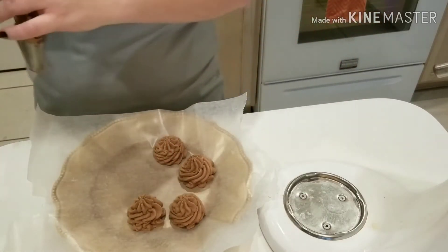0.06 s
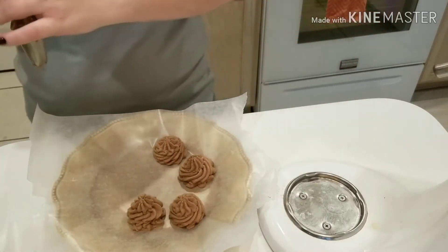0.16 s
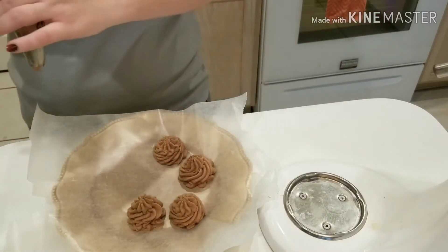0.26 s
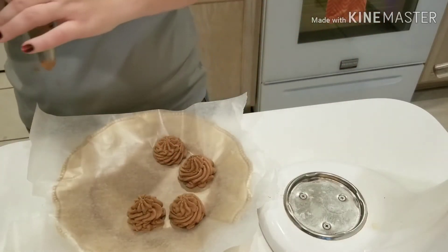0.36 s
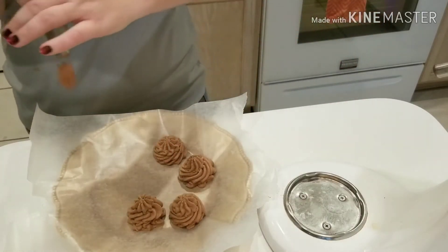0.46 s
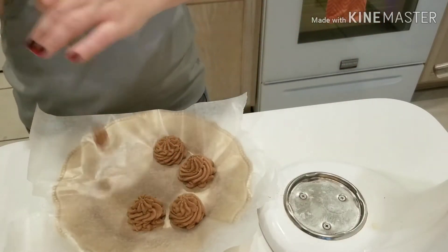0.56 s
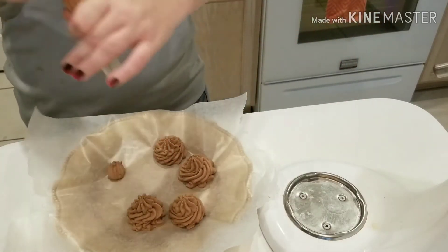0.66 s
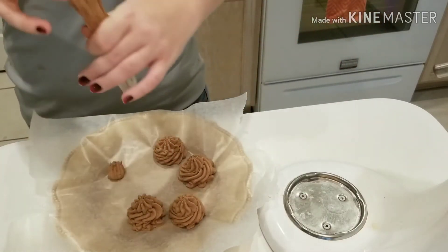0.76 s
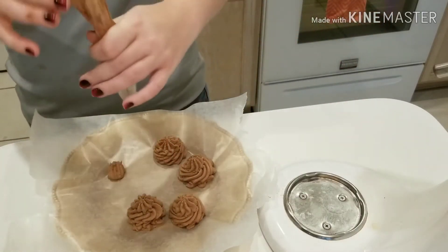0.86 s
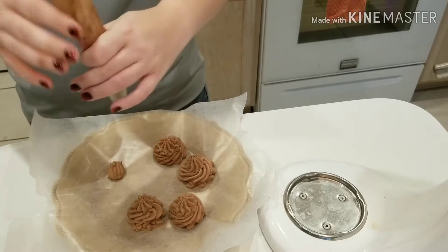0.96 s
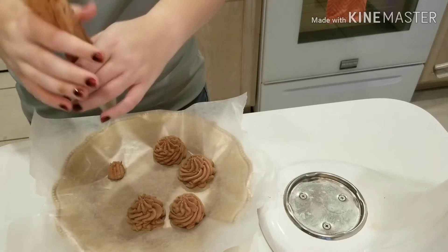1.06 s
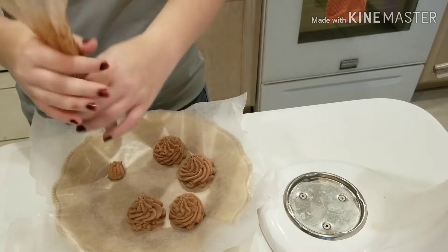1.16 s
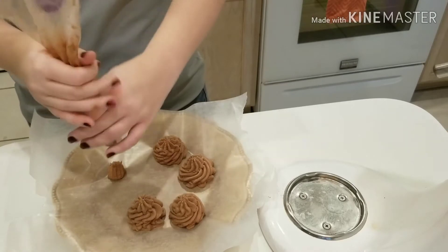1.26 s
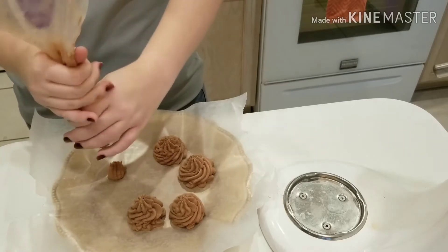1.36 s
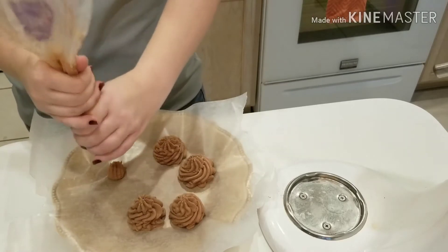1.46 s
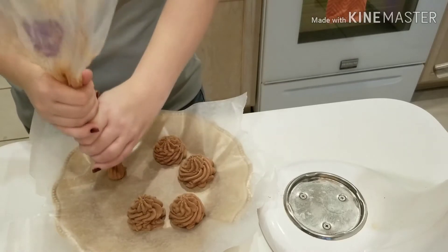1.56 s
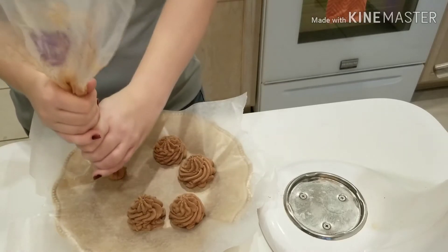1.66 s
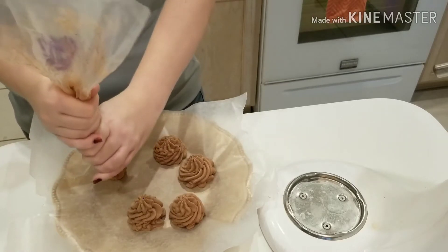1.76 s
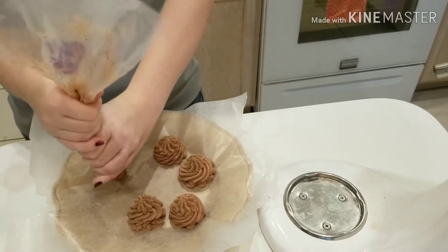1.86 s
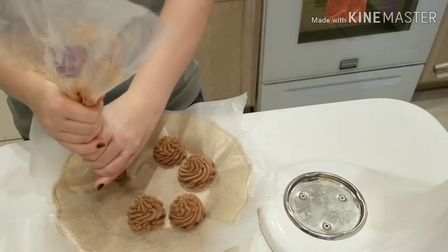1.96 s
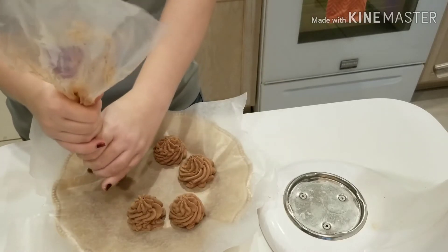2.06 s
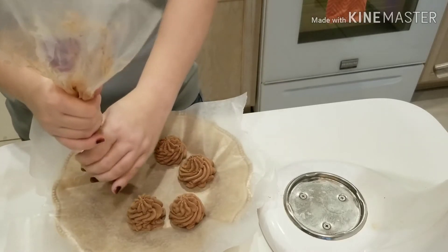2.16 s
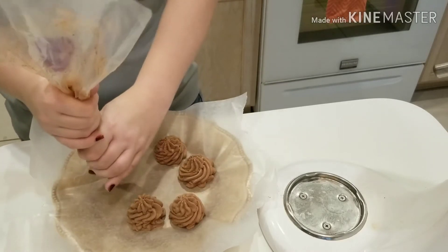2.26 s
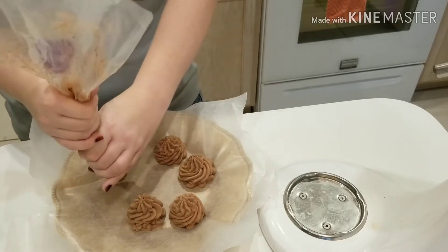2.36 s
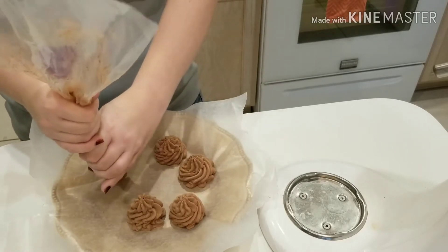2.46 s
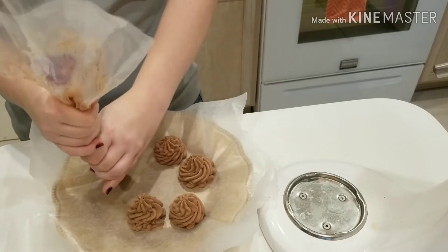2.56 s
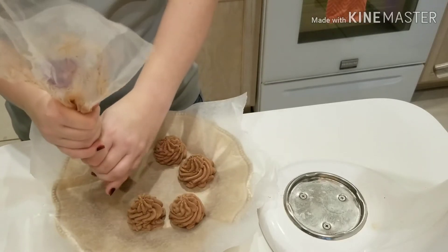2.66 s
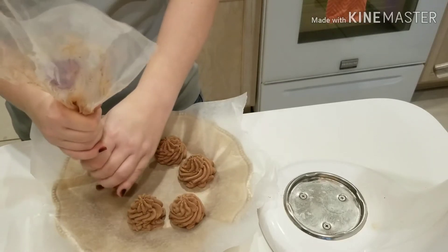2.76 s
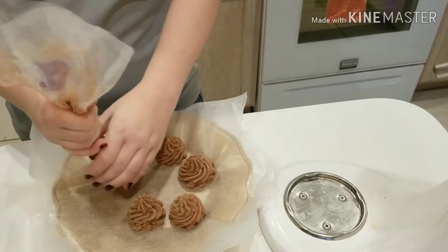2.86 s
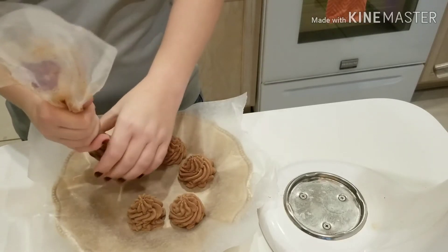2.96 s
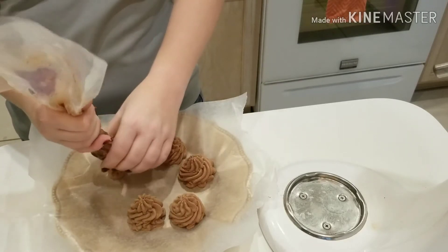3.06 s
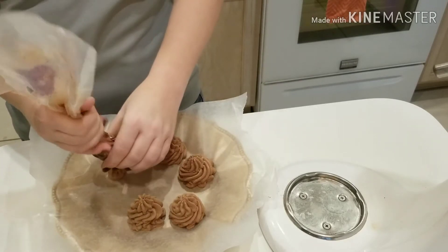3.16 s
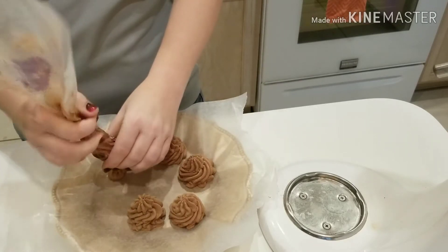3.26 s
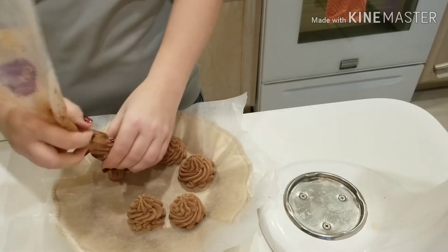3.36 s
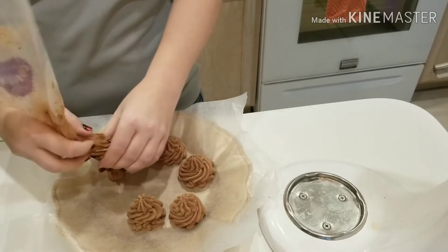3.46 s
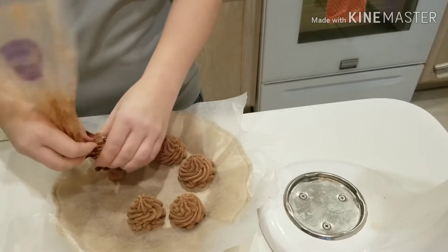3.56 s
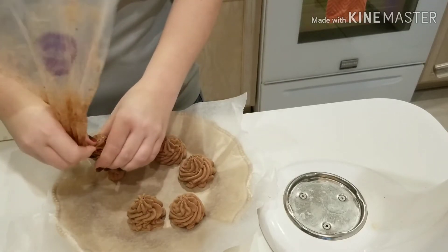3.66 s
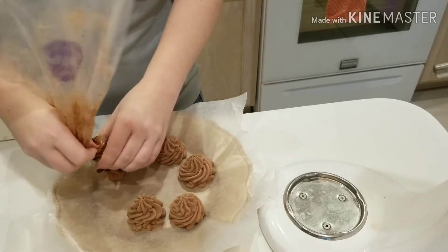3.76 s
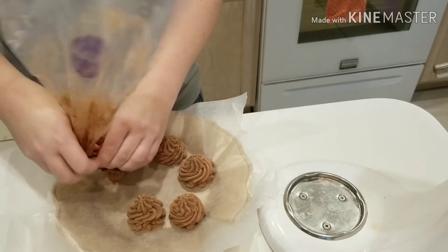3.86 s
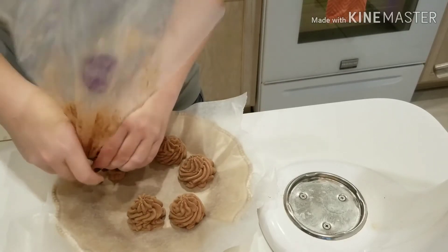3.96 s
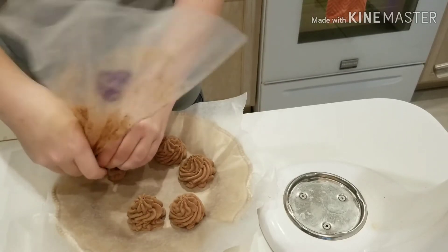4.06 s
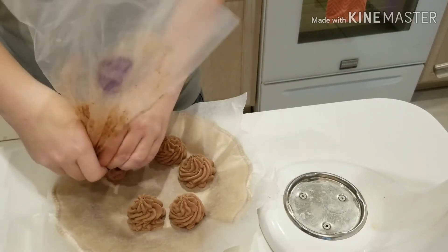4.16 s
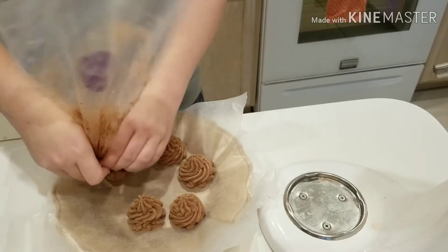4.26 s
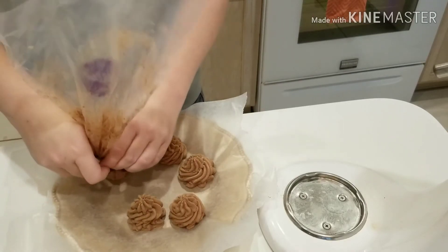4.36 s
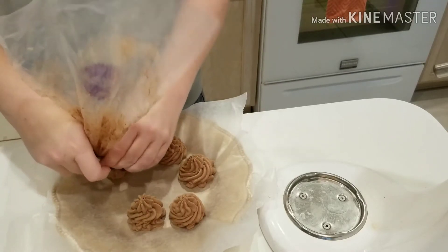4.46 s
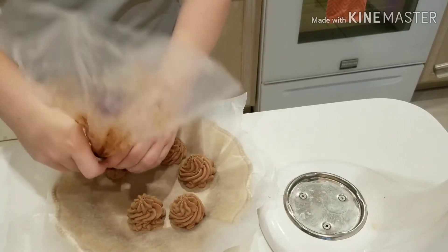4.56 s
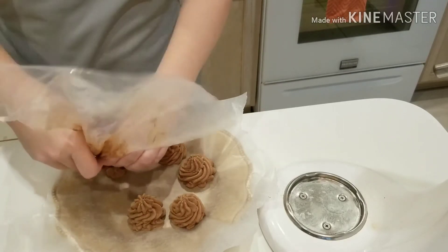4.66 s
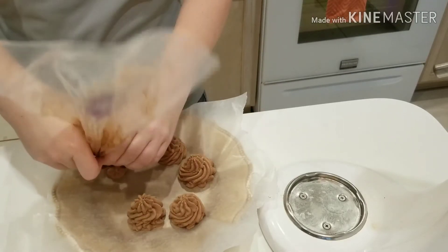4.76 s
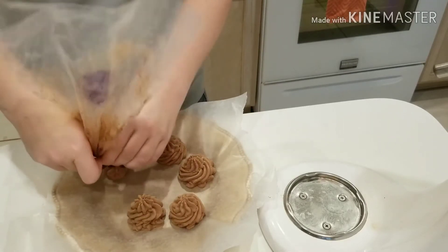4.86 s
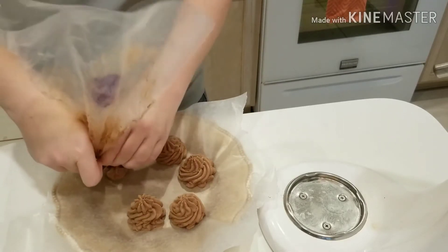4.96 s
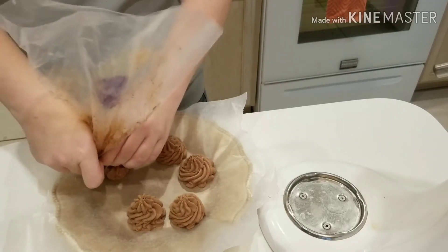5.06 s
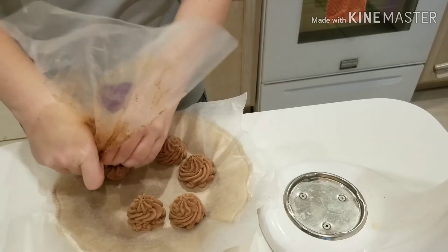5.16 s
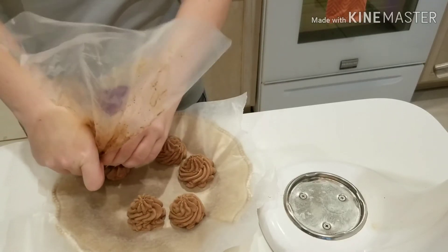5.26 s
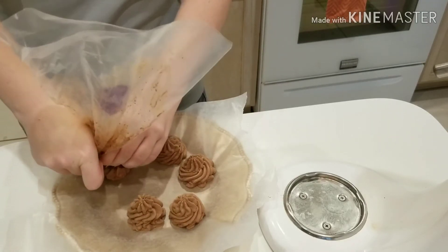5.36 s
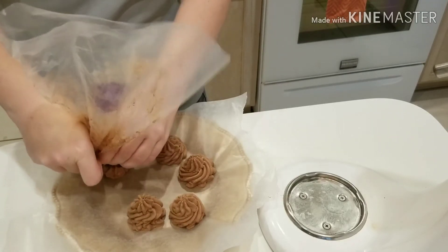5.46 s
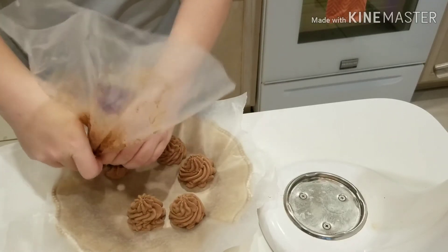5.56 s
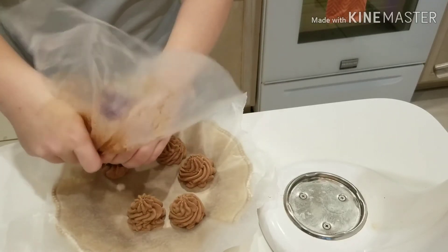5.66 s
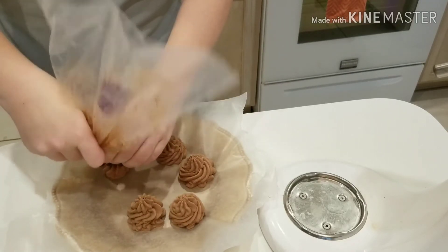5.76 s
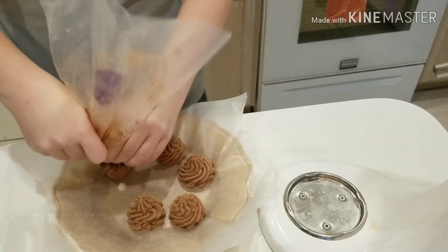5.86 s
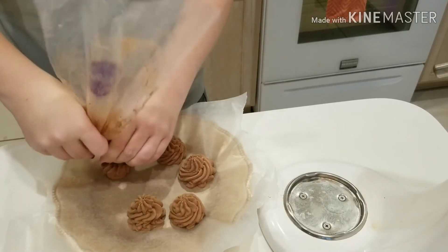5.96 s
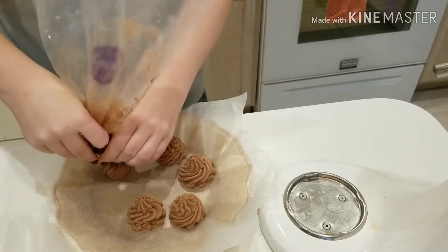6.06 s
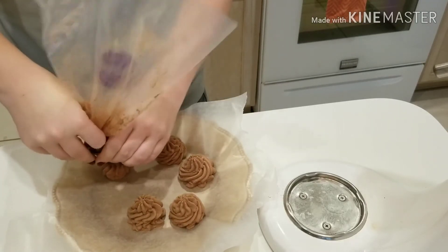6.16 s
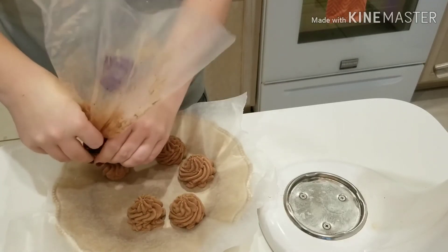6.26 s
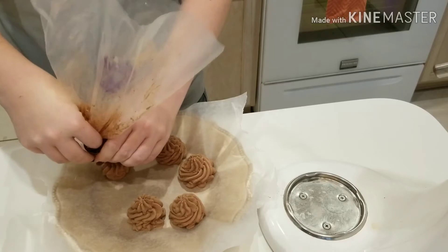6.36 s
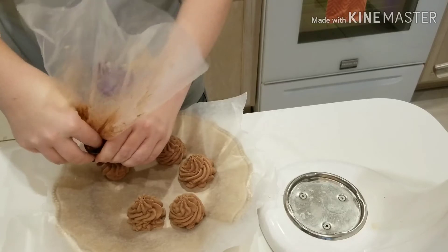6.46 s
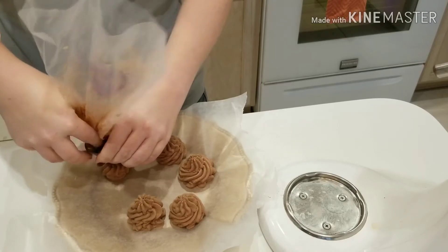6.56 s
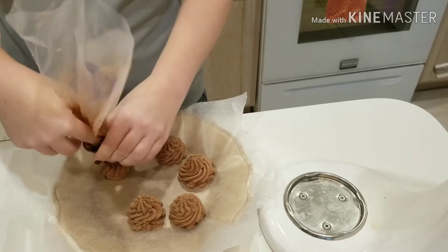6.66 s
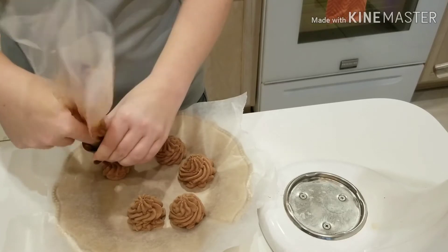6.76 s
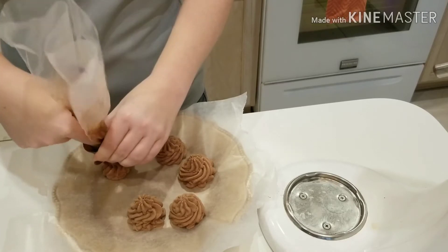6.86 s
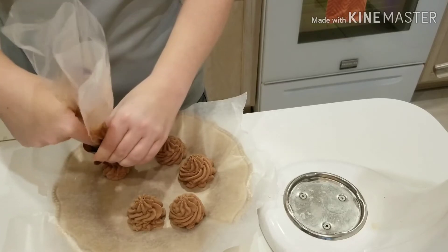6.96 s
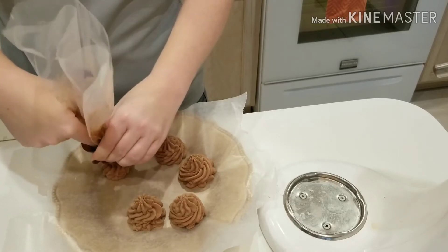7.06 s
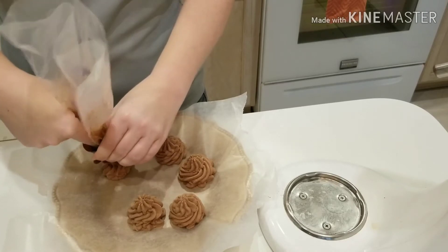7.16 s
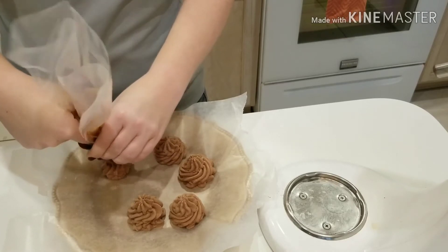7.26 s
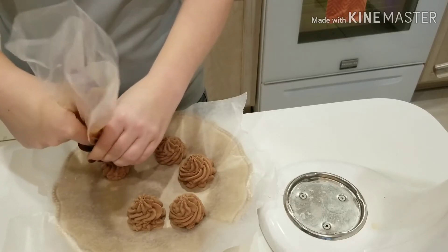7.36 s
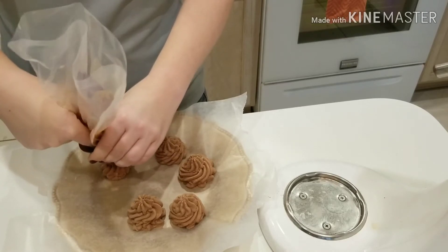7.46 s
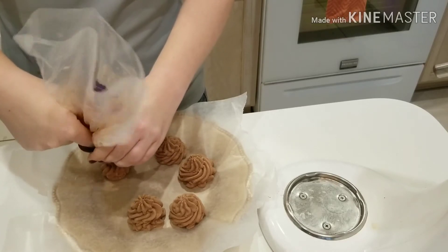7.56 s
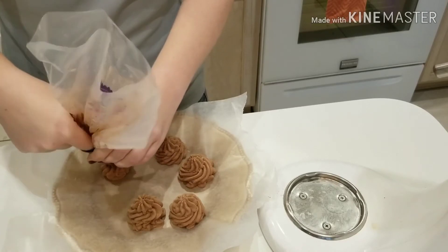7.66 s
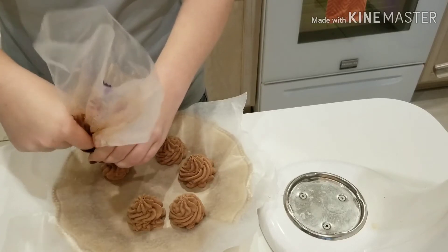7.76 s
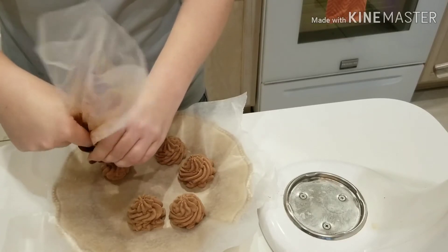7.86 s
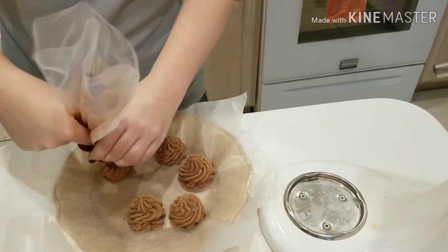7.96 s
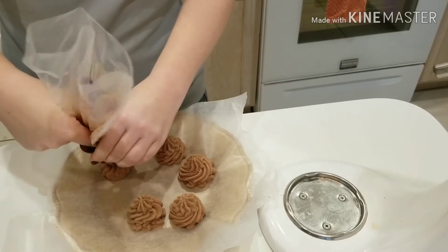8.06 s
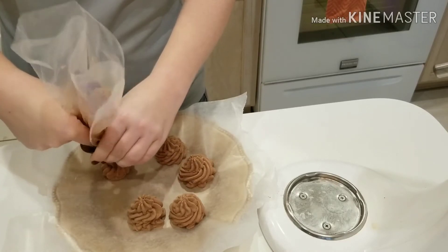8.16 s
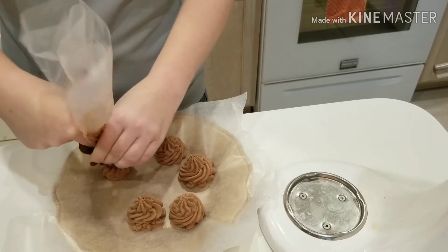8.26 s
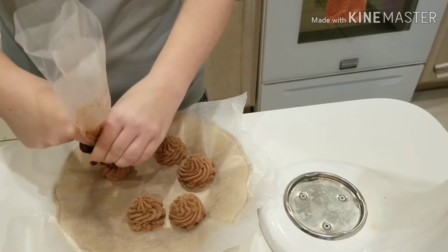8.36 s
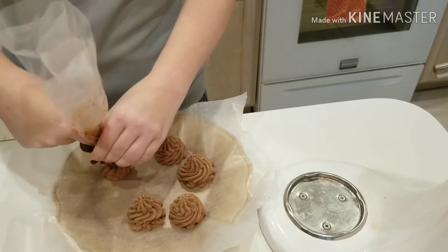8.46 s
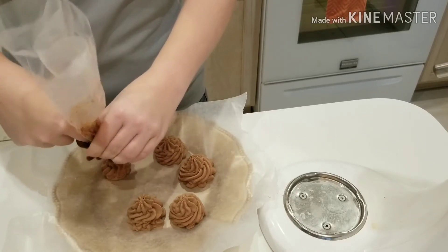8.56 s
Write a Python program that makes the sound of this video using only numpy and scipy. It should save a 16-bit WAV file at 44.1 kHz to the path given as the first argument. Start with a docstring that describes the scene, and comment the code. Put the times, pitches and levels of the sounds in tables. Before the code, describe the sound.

A thin plastic piping bag crinkles close by from the start, with small sharp snaps and the hiss of skin rubbing on plastic. At about 0.6 seconds a dollop lands on baking paper with one short, crisp splat, the loudest sound, followed by two very soft taps as it bounces. From 1 to 3 seconds there are only light, scattered ticks and faint rubs. A cluster of crinkles comes between 3.2 and 3.6 seconds, then a lull. From about 5 to 7 seconds the bag is squeezed and twisted, giving the busiest run of irregular snaps and fine crackle. After a short pause, a few separate snaps come between 7.9 and 8.3 seconds. Each snap rings briefly in the hard-walled kitchen, and a faint low hum and rumble of distant appliances continues underneath.

```python
"""Piping bag in a kitchen

Hands squeeze and twist a thin plastic piping bag over a counter, heard by two microphone ports a few
cm apart. Creases in the film buckle with short snaps, smaller ones crackle between them, skin rubs
on the film and a dropped dollop splats on baking paper and bounces softly. The hard room rings after
each snap; appliances hum and rumble far off."""
import sys
import numpy as np
from scipy import signal
from scipy.fft import rfft, irfft, next_fast_len
from scipy.io import wavfile
from scipy.ndimage import map_coordinates

SR = 44100
rng = np.random.default_rng(int(sys.argv[2]) if len(sys.argv) > 2 else 0)


def dump(signal):
    """Clip the signal to [-1, 1] and save it as 16-bit WAV at the path in sys.argv[1]."""
    limited = np.clip(np.atleast_2d(signal).T, -1, 1)
    pcm = np.round(limited * 32767).astype(np.int16)
    wavfile.write(sys.argv[1], SR, pcm)


N = 380141
TIME_S = np.arange(N) / SR


def from_db(db):
    """Level to amplitude gain."""
    return 10 ** (np.asarray(db) / 20)


def rms_one(x, axis=None):
    """Scale to unit rms."""
    return x / np.sqrt(np.mean(x ** 2, axis=axis, keepdims=True) + 1e-20)


def in_time(rows):
    """One per-sample curve for each column after the time."""
    times_s, *columns = np.transpose(rows)
    return [np.interp(TIME_S, times_s, column) for column in columns]


def at_hz(points, hz):
    """Interpolate (frequency, value) points on a log-frequency axis."""
    points_hz, values = np.transpose(points)
    return np.interp(np.log(np.maximum(hz, 1)), np.log(points_hz), values)


def colour(x, spectrum):
    """Filter by a (frequency [Hz], gain [dB]) curve."""
    size = next_fast_len(x.shape[-1])
    gain = from_db(at_hz(spectrum, np.fft.rfftfreq(size, 1 / SR)))
    return irfft(rfft(x, size) * gain, size)[..., :x.shape[-1]]


def band(x, low_hz, high_hz):
    """Butterworth band-pass."""
    return signal.sosfilt(signal.butter(2, [low_hz, high_hz], "band", fs=SR, output="sos"), x)


def narrow_band(x, hz, width_hz):
    """Unit-rms band around a centre frequency."""
    return rms_one(band(x, hz - width_hz / 2, hz + width_hz / 2))


def correlate(shared, own, correlation):
    """Blend one shared noise into independent channels."""
    return np.sqrt(correlation) * shared + np.sqrt(1 - correlation) * own


def random_clicks(rate_per_s, spread_db, max_db):
    """Poisson impulses of either sign, mostly small."""
    sizes = from_db(np.minimum(spread_db * rng.exponential(1, N), max_db))
    signs = rng.choice([-1, 1], N)
    return sizes * signs * (rng.random(N) < rate_per_s / SR)


# Diffuse field at the ports: (frequency [Hz], left-right correlation [-1..1])
DIFFUSE_CORRELATION = [(40, 0.91), (125, 0.98), (250, 0.86), (500, 0.56), (1000, 0.18), (2000, -0.17),
                       (4000, -0.11), (16000, 0.2)]


def diffuse_noise(size):
    """White noise arriving from all sides at two close ports."""
    mid, side = rfft(rng.standard_normal((2, size)))
    correlation = at_hz(DIFFUSE_CORRELATION, np.fft.rfftfreq(size, 1 / SR))
    mid *= np.sqrt((1 + correlation) / 2)
    side *= np.sqrt((1 - correlation) / 2)
    return irfft([mid + side, mid - side], size)


# Appliance levels: (time [s], rumble and hum [dB], drone [dB])
APPLIANCE_LEVELS = [(0.0, -50.5, -68), (1.34, -56.5, -67), (3.27, -52, -55), (3.94, -53, -66.5),
                    (4.61, -53, -58), (7.06, -52, -56.5), (7.28, -55, -75), (7.32, -53, -56),
                    (8.23, -53.5, -58.5), (8.62, -53, -65.5)]
# Rumble and hiss: (frequency [Hz], relative density [dB])
RUMBLE_SPECTRUM = [(12, -51.5), (20, -18.5), (44, -12), (65, -16), (123, 0.5), (154, -10), (262, -11.5),
                   (301, -13.5), (357, -13.5), (527, -18), (1400, -38.5), (1610, -38.5), (4060, -62.5),
                   (12400, -49.5), (16000, -48)]
# Mains tones and room resonances: (frequency [Hz], width [Hz], level re rumble [dB])
HUM_BANDS = [(119.44, 2.3, -5), (180, 9, -13.5), (259, 11, -14.5), (360, 6, -17), (725, 30, -24)]


def appliances():
    """Distant broad rumble, narrow wavering hum bands and a low drone that swells."""
    level_db, drone_db = in_time(APPLIANCE_LEVELS)
    even_size = N + N % 2
    hum = rms_one(colour(diffuse_noise(even_size)[:, :N], RUMBLE_SPECTRUM))
    noise = diffuse_noise(even_size)[:, :N]
    for hz, width_hz, tone_db in HUM_BANDS:
        hum += from_db(tone_db) * narrow_band(noise, hz, width_hz)
    drone = narrow_band(noise, hz=80, width_hz=12)
    return from_db(level_db) * hum + from_db(drone_db) * drone


# Room decay: (frequency [Hz], T60 [s], level [dB])
ROOM_BANDS = [(306.2, 0.94, -9.5), (1013, 0.84, -2), (2500, 0.65, -1), (5020, 0.58, -6), (10200, 0.42, -7),
              (14930, 0.35, -12)]


def kitchen_reverb(x):
    """Near cupboards answer with a short decay, the whole room with a longer one, band by band."""
    near_t60_ratio, near_db = 0.36, -2.5
    first_wall_s, build_up_s, counter_scatter = 0.0045, 0.002, 0.45
    t, grid_hz = np.arange(SR) / SR, np.fft.rfftfreq(SR, 1 / SR)
    noise, tail = rfft(diffuse_noise(SR)), np.zeros((2, SR))
    for hz, t60_s, level_db in ROOM_BANDS:
        crossfade = at_hz([(row[0], row[0] == hz) for row in ROOM_BANDS], grid_hz)
        room = from_db(-60 * t / t60_s)
        near = from_db(-60 * t / (t60_s * near_t60_ratio))
        envelope = room / np.linalg.norm(room) + from_db(near_db) * near / np.linalg.norm(near)
        tail += irfft(noise * crossfade, SR) * envelope * from_db(level_db)
    # Only counter and hands scatter before the first wall answers.
    tail *= np.clip((t - first_wall_s) / build_up_s, counter_scatter, 1)
    return signal.fftconvolve(x[None], tail, axes=1)[:, :N]


def faint_rub():
    """One brief, narrow band of rubbing noise."""
    envelope = np.interp(TIME_S, [3.78, 3.86, 3.87], [0, 1, 0])
    return from_db(-68) * envelope * narrow_band(rng.standard_normal((3, N)), hz=1640, width_hz=300)


# Fingers sliding along the film: (start [s], peak [s], end [s], level [dB])
FINGER_SLIDES = [(0.452, 0.476, 0.505, -60), (2.05, 2.12, 2.3, -70), (2.717, 2.79, 2.86, -66),
                 (3.12, 3.18, 3.22, -62), (3.25, 3.32, 3.35, -70), (4.445, 4.49, 4.6, -71),
                 (4.71, 4.78, 4.83, -70), (5.57, 5.587, 5.6, -58), (7.6, 7.725, 7.76, -70)]
# Skin on film: (frequency [Hz], relative density [dB])
RUB_SPECTRUM = [(800, -14), (1700, -3.5), (3000, -2.5), (5000, -0.5), (8000, -2), (12000, 0.5),
                (16000, -4.5)]


def rubbing(level_db):
    """Skin hisses and catches on the film over a hand's breadth; each slide swells it."""
    catch_db = -7.5
    gain = from_db(level_db)
    for start_s, peak_s, end_s, slide_db in FINGER_SLIDES:
        gain += from_db(slide_db) * np.interp(TIME_S, [start_s, peak_s, end_s], [0, 1, 0])
    hiss = correlate(rng.standard_normal(N), rng.standard_normal((3, N)), correlation=0.069)
    catches = rms_one(random_clicks(rate_per_s=410, spread_db=9, max_db=27))
    return gain * rms_one(colour(hiss + from_db(catch_db) * catches, RUB_SPECTRUM))


# Fine crackle of the film: (frequency [Hz], relative density [dB])
CRACKLE_SPECTRUM = [(400, 1), (900, -0.5), (2000, -2.5), (3500, -2), (7000, -25.5), (15000, -18.5)]


def crackle(level_db):
    """Small creases give in random clumps, each ringing a patch of film of its own size."""
    base_rate_per_s, clump_hz, clump_db = 1700, 40, 8
    clumps = rms_one(band(rng.standard_normal(N), clump_hz / 4, clump_hz))
    clicks = random_clicks(base_rate_per_s * from_db(clump_db * clumps), spread_db=9, max_db=36)
    patches_hz = np.geomspace(500, 13000, 12)
    patch_index = rng.integers(0, len(patches_hz), N)
    out = np.zeros(N)
    for k, hz in enumerate(patches_hz):
        patch = rms_one(band(clicks * (patch_index == k) + 1e-18, hz / 1.2, hz * 1.3))
        out += patch * from_db(at_hz(CRACKLE_SPECTRUM, hz)) * np.sqrt(hz)   # power grows with bandwidth
    return rms_one(out) * from_db(level_db)


# Dollop on baking paper: (frequency [Hz], relative density [dB])
SPLAT_SPECTRUM = [(250, -22), (400, -8.5), (1000, -15), (1500, -8), (2500, -9), (4500, -4), (8000, 0),
                  (12000, -1), (15500, -2)]


def splat():
    """A dollop lands: the ports hear the paper rattle briefly, the walls get a single blow."""
    start_s, attack_s, hold_s, release_db_per_s = 0.6205, 0.0035, 0.0095, 2500
    level_db, swell_db, wall_db = -18.5, 0.5, 1.5
    t = TIME_S - start_s
    attack = np.clip(t / attack_s, 0, 1) ** 2
    hold_db = level_db + swell_db * np.clip((t - attack_s) / hold_s, 0, 1)
    release_db = release_db_per_s * np.clip(t - attack_s - hold_s, 0, 0.05)
    noise = rng.standard_normal((3, N))
    rattle = rms_one(colour(correlate(noise[0], noise[1:], correlation=0.16), SPLAT_SPECTRUM))
    left, right = attack * from_db(hold_db - release_db) * rattle
    impulse = signal.unit_impulse(N, round((start_s + attack_s + hold_s / 2) * SR))
    blow = colour(impulse, SPLAT_SPECTRUM)
    blow *= from_db(wall_db) * np.linalg.norm(left) / np.linalg.norm(blow)
    return np.array([left, right, blow])


def panel_ring(t, ring_hz):
    """A thin panel rings towards the ports; sideways it gives a shorter, weaker knock."""
    t60_cycles, knock_cycles, knock_db = 14, 2.5, -4
    cycles = t * ring_hz[:, None]
    envelope = np.minimum(cycles, 1) * from_db(-60 * cycles / t60_cycles)
    ring = rms_one(envelope * np.sin(2 * np.pi * cycles), axis=-1)
    knock = rms_one(ring * np.exp(-cycles / knock_cycles), axis=-1)
    return np.stack([ring, ring, from_db(knock_db) * knock], axis=1)


# Crack of a snap: (low [Hz], high [Hz], decay [ms], left-right correlation [0..1])
SNAP_BANDS = [(550, 1500, 2.2, .9), (1500, 3000, 1.9, .85), (3000, 5500, 1.6, .75), (5500, 9000, 1.3, .7),
              (9000, 15500, 1.0, .65)]
# Snaps of the film, plus two soft taps as the dollop bounces (0.791, 0.81 s) and a dull early room
# echo just after a snap (8.264 s). The hands shade ports or walls.
# (time [s], ring [Hz], ring [dB], crack in each of the five SNAP_BANDS [dB], walls re ports [dB])
SNAPS_AND_TAPS = [(0.0051, 7730.0, -55, -68, -52, -47, -61, -53, 0),
                  (0.0338, 2010, -52, -74, -52, -65, -71.0, -70.0, 3.5),
                  (0.0366, 8200, -61, -67.5, -64, -56, -53.5, -47.5, -8),
                  (0.0566, 4030, -40.5, -69.5, -51, -52, -66, -64.0, 1),
                  (0.074, 3060.0, -59, -73.5, -51.0, -44, -46.5, -56, -5),
                  (0.0809, 2410.0, -62, -74, -61, -64.0, -62, -49, -6),
                  (0.0878, 3510, -74, -69.5, -70.5, -71, -64.5, -57, -7),
                  (0.0978, 2240, -53, -69, -51.5, -54, -70.0, -66.0, -7),
                  (0.138, 2780.0, -66, -75, -53, -50, -71, -69, -4),
                  (0.157, 3340, -50, -67, -56, -59, -58.5, -55, -4),
                  (0.1786, 2900, -41.5, -46.5, -63, -44, -51, -50, 2),
                  (0.2044, 2100, -43, -52.5, -57, -47, -66, -53, -1.5),
                  (0.229, 6000, -53, -80, -72, -62.5, -60, -70, -4.5),
                  (0.2544, 2390.0, -71.0, -79, -71.0, -57, -63, -69, -1),
                  (0.271, 2500.0, -69.0, -64.5, -67, -71.0, -64, -62, 11),
                  (0.278, 2100, -61, -66, -63, -50, -64, -57.0, -7.5),
                  (0.2813, 1730, -67.5, -59, -56, -62, -77.0, -68.5, 10),
                  (0.294, 1720.0, -46, -57, -62, -65.5, -77.0, -75.5, 0),
                  (0.3002, 9930.0, -53, -59, -71, -53.5, -60, -50.5, 4),
                  (0.3169, 1216, -38, -55, -54, -62.5, -70, -55, -9),
                  (0.318, 2070, -33, -48, -49, -50, -61.5, -43.5, 0.5),
                  (0.355, 4080, -56, -55, -63, -59, -73, -70.0, 7.5),
                  (0.6115, 1740.0, -74, -65, -68, -60, -79, -75, 11),
                  (0.791, 1310, -58, -63, -60, -64, -80, -80, -6),
                  (0.81, 2000, -62, -69, -64, -64, -80, -80, -9),
                  (0.9271, 2710.0, -63, -76.5, -55.5, -48, -81, -65, -7),
                  (1.14, 3380, -75, -89.5, -70, -69.5, -94, -93, 1),
                  (1.159, 1530.0, -72, -73, -60, -66, -81, -79, -9),
                  (1.166, 2350.0, -71, -76.5, -70, -58.5, -75, -57.5, 7.5),
                  (1.181, 2280, -58, -59, -52.5, -53.5, -56.0, -56, -2.5),
                  (1.192, 4800, -57, -81.5, -59, -63, -73, -84, -14),
                  (1.225, 3960.0, -64, -65.5, -75, -64.0, -75.0, -80.0, -1),
                  (1.2368, 4820.0, -65, -58, -77, -51.5, -57, -58, 1.5),
                  (1.278, 6000, -74, -61, -61.5, -55.5, -57.5, -54.5, 3.5),
                  (1.2924, 4440.0, -66, -85, -70.0, -71, -76, -72.0, 1),
                  (1.3859, 2260, -67, -56, -55, -56, -61, -59.5, -3),
                  (1.434, 1560, -68.5, -65.5, -70.5, -65, -77, -77, -3),
                  (1.5638, 4760.0, -64.5, -79, -73, -66, -80, -87, 0.5),
                  (1.584, 3170.0, -73, -91, -67.5, -81.5, -76, -91, 5),
                  (2.124, 2800, -67.0, -68, -66.5, -64.0, -89, -71, 5.5),
                  (2.1418, 2780, -73, -60.5, -53.5, -61.5, -85, -87.0, -4.5),
                  (2.1994, 2950.0, -64, -90.5, -77, -70, -65, -74.0, 5),
                  (2.2249, 4120, -55, -68, -60.5, -54, -72, -48.5, 0.5),
                  (2.672, 1210, -73, -74.5, -72.5, -80.5, -90, -82, 2.5),
                  (2.8549, 8440.0, -59, -66.5, -66.5, -69, -63, -59, 0),
                  (2.8875, 6000, -60.5, -95.5, -66.5, -61, -58, -65, -0.5),
                  (3.1757, 9110.0, -73, -65, -62.5, -68, -69, -62, 9.5),
                  (3.19, 2200, -75, -75.5, -66, -62, -67.0, -56, 4),
                  (3.199, 4630, -70, -60, -75, -51.5, -75, -64, -12),
                  (3.209, 4500, -60, -70, -60, -59, -64, -68, -5),
                  (3.2664, 7860.0, -74, -88, -77, -61, -72, -66, -7),
                  (3.3162, 8330.0, -71, -73.5, -80, -71, -58, -68.0, -3),
                  (3.3236, 7280.0, -66, -77.5, -67.0, -50, -64, -56, -14),
                  (3.3614, 2470, -45, -58, -56, -45.5, -46, -43.5, -4),
                  (3.3768, 2430, -68, -57, -60, -64, -64, -63.0, -1),
                  (3.4462, 2170, -60, -56.5, -52.5, -49, -59, -63, -3),
                  (3.4947, 5350, -54, -75.5, -55, -54, -55, -55, -1),
                  (3.547, 3340.0, -53, -55.5, -52, -52, -53, -49, -3.5),
                  (3.5669, 3530.0, -74, -67, -72, -57, -60, -52.5, 9),
                  (3.5721, 10000, -50, -62, -60, -45, -50.5, -45, -10),
                  (3.586, 2300.0, -57, -68.5, -63, -63, -56, -64.0, -9),
                  (3.8595, 4800.0, -57, -77.5, -72, -66, -64, -55.5, -1),
                  (3.9839, 3940, -58, -62, -57, -54, -79, -61, 3),
                  (4.1275, 8500, -59.5, -79, -74.5, -64.5, -76, -57.5, 5.5),
                  (4.4774, 4760, -75, -84, -73.5, -71.5, -76.0, -83, 6),
                  (4.769, 5630, -71, -81, -74.5, -73, -72, -90, 8),
                  (4.8072, 2490, -55, -77, -56, -52, -59, -58, -1),
                  (4.9762, 2050.0, -67, -75, -60, -76, -100.0, -93, 4.5),
                  (4.9815, 3490.0, -71, -68, -71, -79, -87, -96, -5),
                  (4.999, 2720, -47.5, -74, -51, -65, -71, -76, -6),
                  (5.0339, 2410.0, -61, -61, -56, -56, -60, -53, 1.5),
                  (5.0552, 3430, -52, -67, -48.5, -44, -53, -48.5, 5.5),
                  (5.06, 2780, -34, -76, -56, -47, -49, -54, -16),
                  (5.1203, 3210.0, -56, -60, -62, -50, -61, -64, -17),
                  (5.1455, 4230, -47, -74, -48.5, -38.5, -44, -31.5, -4.5),
                  (5.2228, 2500, -58, -68, -55, -58, -62, -78.0, 1.5),
                  (5.3508, 8700, -56, -50, -50.5, -44, -49, -41.5, -4.5),
                  (5.497, 8500, -64, -74, -65, -66, -60, -68.0, 4.5),
                  (5.5296, 3020, -55, -56.5, -61, -49.5, -53.5, -49, -2),
                  (5.5845, 2900, -64, -62, -66, -59, -74, -69, 2.5),
                  (5.588, 5040.0, -64, -68, -56, -63, -60.0, -58, -9),
                  (5.6638, 2130, -69, -51, -53.5, -53.5, -59.5, -64, -3.5),
                  (5.7367, 2630, -56, -75, -70, -60.0, -57.5, -57, -2),
                  (5.7399, 2710.0, -64, -61, -55, -54.5, -69, -72.0, -3),
                  (5.7829, 2430.0, -55, -56, -71, -60, -65, -59, 2.5),
                  (5.799, 4200, -68, -69.0, -58, -52, -69, -61, -9),
                  (5.8344, 10100, -58, -62, -79.0, -66, -62, -58, 6.5),
                  (5.8396, 1080, -45.5, -53, -48.5, -49.5, -65, -56, -7),
                  (5.9216, 2580, -50.5, -62, -47, -48, -59.0, -69.0, -5.5),
                  (5.928, 2600, -81, -79.5, -65, -61, -68, -71, 3),
                  (5.963, 2500.0, -49, -56.5, -55, -55, -65.0, -67.0, -13),
                  (5.9656, 2360, -53, -59.5, -62, -54, -57, -60, -5.5),
                  (5.9747, 2410.0, -61, -62.5, -58, -60, -69.0, -69, -15),
                  (6.101, 2430, -51, -49.5, -55, -68, -72.0, -80, -3),
                  (6.149, 2740, -65, -79, -61, -55, -58.0, -55, -1),
                  (6.1563, 2390, -54, -50.5, -52, -67, -69, -67.0, -20),
                  (6.2005, 2610.0, -72.0, -83.5, -66, -74, -80, -88.0, -15),
                  (6.2308, 2500, -51, -53.5, -46, -49, -48.5, -46.5, -5.5),
                  (6.2377, 1970, -58, -64.5, -77, -63, -59, -60, 7),
                  (6.3308, 860.0, -60, -63.5, -54, -65.0, -63, -73.0, -3),
                  (6.3352, 3200, -54, -73.5, -51, -45.5, -65, -70.0, -10),
                  (6.3417, 1960.0, -61, -61.5, -56.0, -64, -55, -66.0, -11),
                  (6.4031, 3140, -69, -83.5, -47, -50, -48.5, -50, -2.5),
                  (6.41, 3100.0, -69, -85.5, -76.0, -70, -64, -55.5, 13),
                  (6.4148, 8600, -59, -72.5, -58, -50.5, -39.5, -44, -9),
                  (6.4551, 2500, -48, -64, -47, -53.5, -59, -60, -10),
                  (6.532, 3200, -53, -57, -65, -53.5, -50, -67, -5),
                  (6.5352, 2520, -59, -52.5, -52, -57, -65, -60, -8),
                  (6.6098, 2560, -42.5, -64, -52, -48.5, -52, -62, -7),
                  (6.6664, 5710.0, -67, -51.5, -67, -51, -51, -68, 1.5),
                  (6.6688, 2150, -50, -63.5, -52, -45.5, -67, -66.0, -3),
                  (6.674, 3200, -54, -76, -68, -65, -56, -61.0, -1.0),
                  (6.6899, 4570.0, -61, -58, -48, -57, -52, -54, -4.5),
                  (6.7167, 2100, -57.0, -60, -49, -50, -53, -60, -7),
                  (6.7457, 5130, -63, -55, -47.5, -44.5, -51, -62, -2),
                  (6.7535, 3420.0, -53.0, -51.5, -64, -57, -51, -53, -3),
                  (6.7874, 2540.0, -48, -66.0, -50, -45, -50.0, -58, -15),
                  (6.8194, 5300, -64, -78.5, -77, -64, -64, -69, 3),
                  (6.8343, 4650.0, -75, -61.5, -56.5, -67, -77.0, -73, -1),
                  (6.8689, 3120, -57, -76.5, -63, -66.0, -67, -74, -8),
                  (6.962, 8300, -56, -60.5, -52, -60, -57, -49.5, -4.5),
                  (7.197, 10230.0, -65, -74, -89.5, -76.5, -79, -66.5, 1.5),
                  (7.267, 4840, -63.5, -70.5, -67, -75, -73, -72, 1),
                  (7.8744, 5660, -43, -81.5, -73, -50, -42, -43.5, -4),
                  (7.9414, 9800, -51.5, -70.5, -64, -56.5, -56, -51, 0),
                  (8.0592, 2700, -63.5, -87, -74, -68, -74, -79, -1.5),
                  (8.0678, 3760, -78, -74, -71.5, -64.5, -79, -88.0, -3),
                  (8.215, 1700, -70.5, -67.5, -64, -71, -75, -84, 10),
                  (8.258, 5000, -55.5, -79.5, -72, -61, -56, -67, -9),
                  (8.2589, 4350, -49.5, -66, -55.5, -49, -52, -56, -5),
                  (8.264, 4200, -61, -56, -53.5, -64.5, -65, -62, -0.5),
                  (8.334, 2970.0, -54.5, -84, -65, -68, -86, -81, -7)]


def snaps():
    """A crease flips with a click, brief flutter and a panel ring; taps and echo share that shape."""
    size, click_energy_ratio, film_low_hz = 512, 0.3, 420
    times_s, ring_hz, ring_db, *crack_db, wall_db = np.transpose(SNAPS_AND_TAPS)
    t, impulse = np.arange(size) / SR, signal.unit_impulse(size)
    noise = rng.standard_normal((len(times_s), len(SNAP_BANDS), 3, size))
    shapes = from_db(ring_db)[:, None, None] * panel_ring(t, ring_hz)
    for k, (low_hz, high_hz, decay_ms, correlation) in enumerate(SNAP_BANDS):
        decay_s = decay_ms / 1000
        click = impulse * np.sqrt(click_energy_ratio * decay_s * SR / 2)
        flutter = correlate(noise[:, k, 2:], noise[:, k, :2], correlation)
        force = np.zeros_like(shapes)
        force[:, :2] = (click + flutter) * np.exp(-t / decay_s)
        force[:, 2] = impulse   # the walls get the even average over all directions
        crack = band(band(force, low_hz, high_hz), low_hz, high_hz)
        shapes += from_db(crack_db[k])[:, None, None] * rms_one(crack, axis=-1)
    shapes[:, 2] *= from_db(wall_db)[:, None]
    out = np.zeros((3, N + size))
    for start, shape in zip(np.round(times_s * SR).astype(int), shapes):
        out[:, start:start + size] += shape
    radiation = signal.butter(2, film_low_hz, "high", fs=SR, output="sos")   # light film, little bass
    return signal.sosfilt(radiation, out[:, :N] + 1e-18)


# Handling of the bag: (time [s], crackle [dB], rubbing [dB])
HANDLING_LEVELS = [(0.0, -59, -48), (0.24, -57, -56), (0.46, -67, -62.5), (0.79, -60.5, -87),
                   (0.98, -87, -74), (1.39, -73.5, -77.5), (1.68, -86, -80), (3.14, -82.5, -77.5),
                   (3.41, -69, -63), (4.32, -86, -76.5), (4.82, -79, -75), (5.16, -60.5, -70),
                   (5.3, -67, -68.5), (6.1, -67, -69.5), (6.65, -60.5, -69), (7.08, -80, -75),
                   (7.54, -83.5, -78), (7.9, -83.5, -72.5), (8.14, -82, -77.5), (8.62, -88, -77)]
# Right-port delay as the bag moves: (time [s], lag [ms])
RIGHT_PORT_LAG = [(0, .1), (.35, .1), (.6, .14), (1.2, .16), (5.1, .125), (6.0, .14), (6.3, .18),
                  (8.62, .18)]


def scene():
    """The bag, a little nearer the left port, feeds both ports and the walls; appliances run behind."""
    left_db = 0.77
    crackle_db, rub_db = in_time(HANDLING_LEVELS)
    lag_ms, = in_time(RIGHT_PORT_LAG)
    left, right, walls = snaps() + crackle(crackle_db) + rubbing(rub_db) + splat() + faint_rub()
    late_right = map_coordinates(right, [np.arange(N) - lag_ms * SR / 1000], order=3)
    direct = np.array([from_db(left_db) * left, late_right])
    return direct + kitchen_reverb(walls) + appliances()


def record(dry):
    """Steep low-pass on the top treble."""
    stop_hz, stop_db = 16400, 65
    return signal.sosfilt(signal.cheby2(16, stop_db, stop_hz, fs=SR, output="sos"), dry)


dry = scene()
out = record(dry)
dump(out)
```